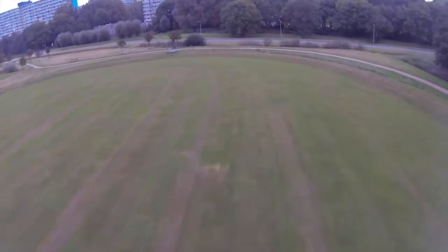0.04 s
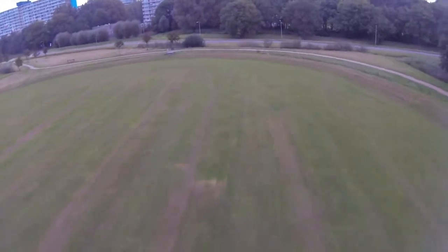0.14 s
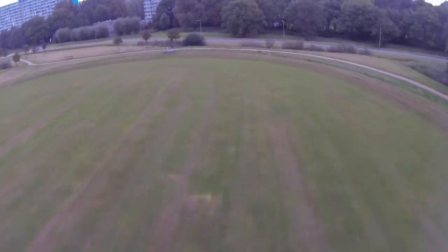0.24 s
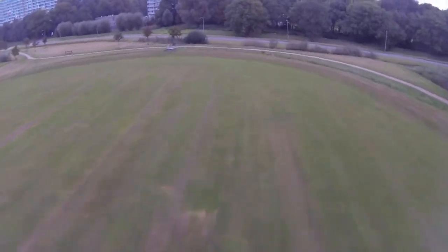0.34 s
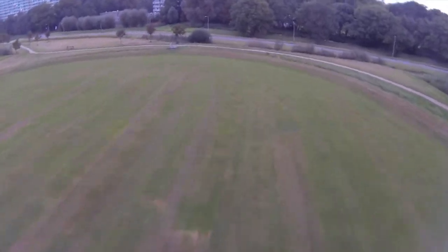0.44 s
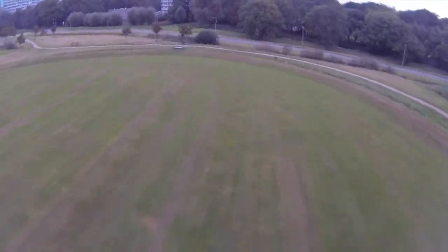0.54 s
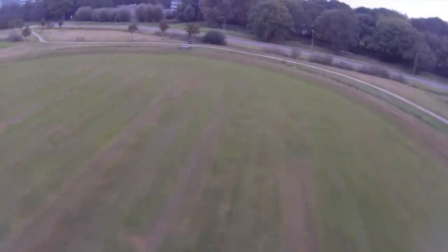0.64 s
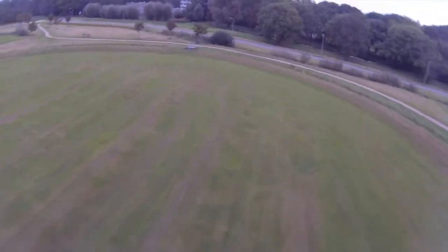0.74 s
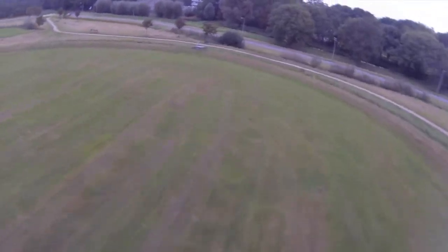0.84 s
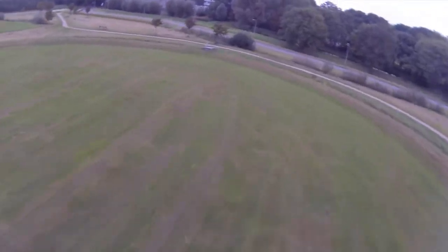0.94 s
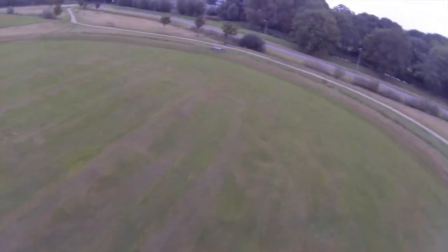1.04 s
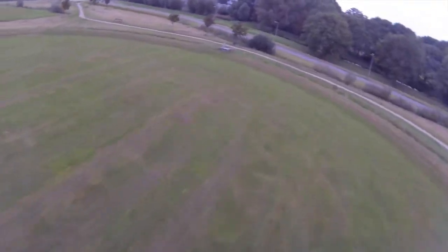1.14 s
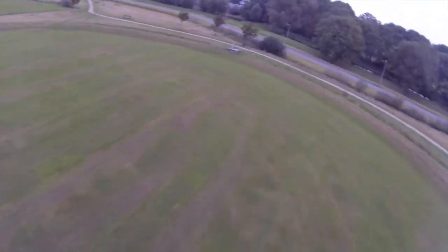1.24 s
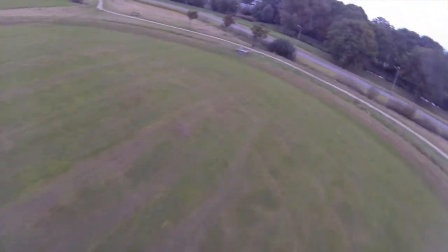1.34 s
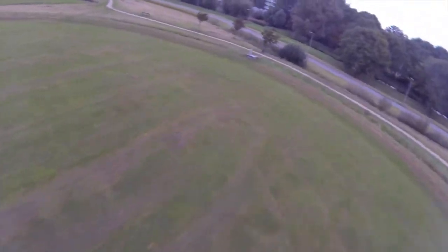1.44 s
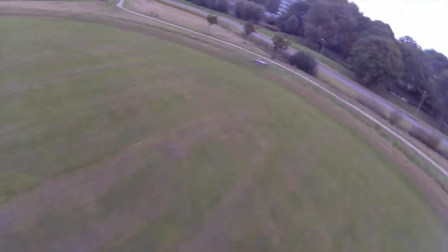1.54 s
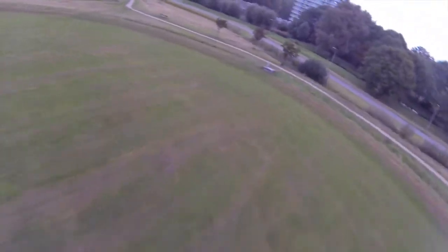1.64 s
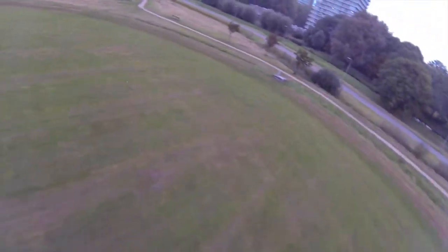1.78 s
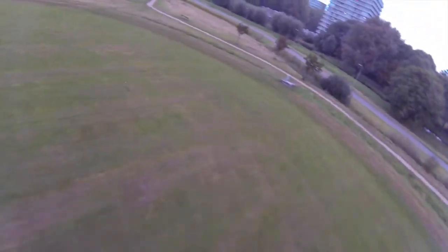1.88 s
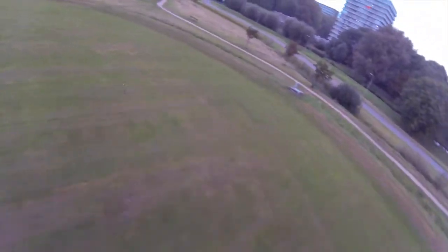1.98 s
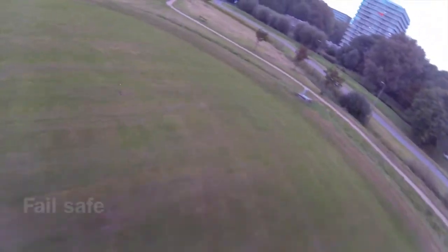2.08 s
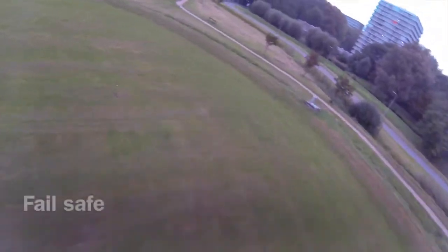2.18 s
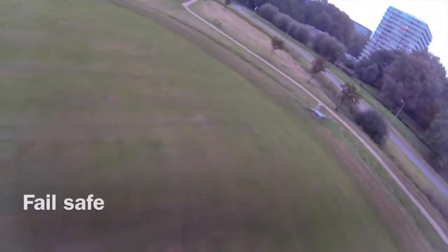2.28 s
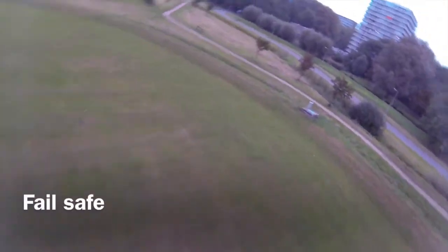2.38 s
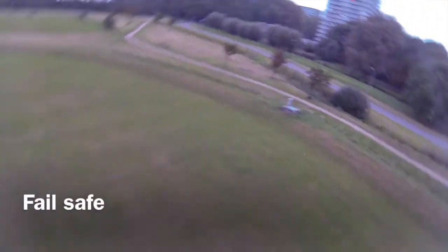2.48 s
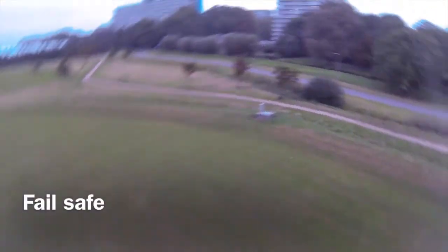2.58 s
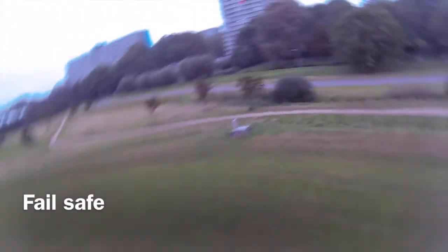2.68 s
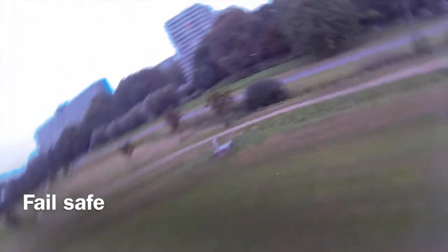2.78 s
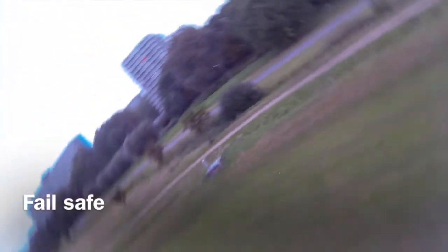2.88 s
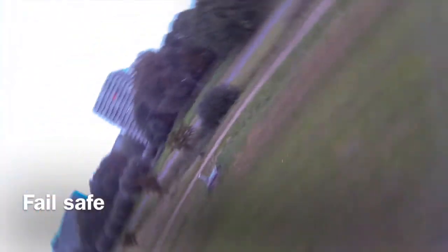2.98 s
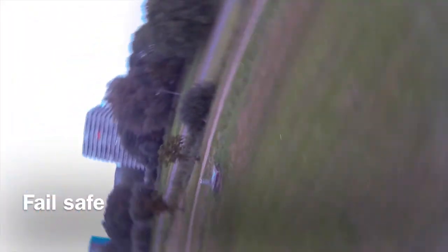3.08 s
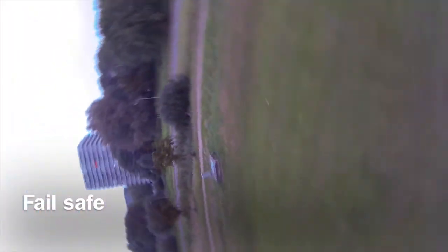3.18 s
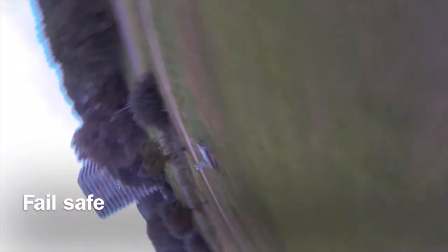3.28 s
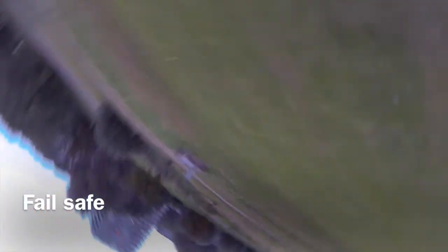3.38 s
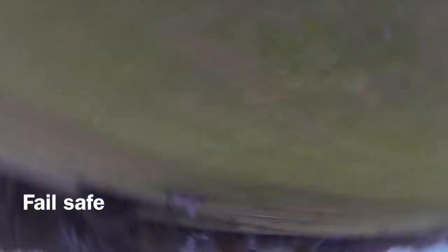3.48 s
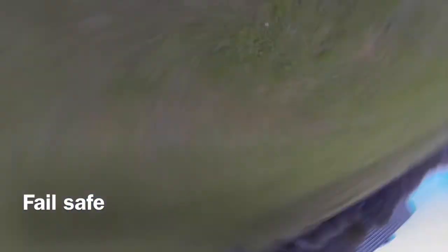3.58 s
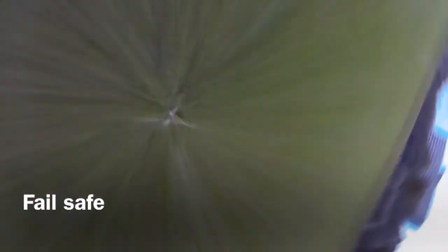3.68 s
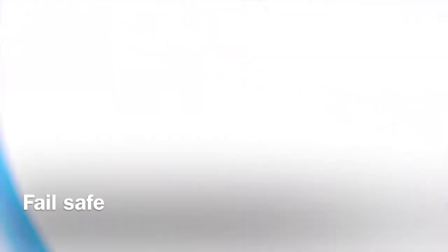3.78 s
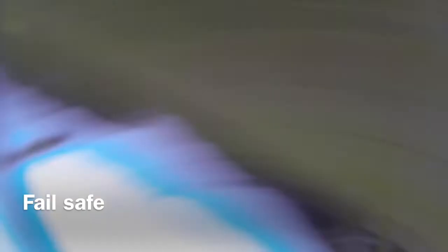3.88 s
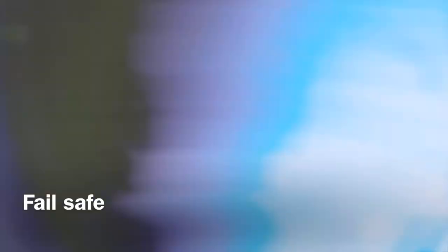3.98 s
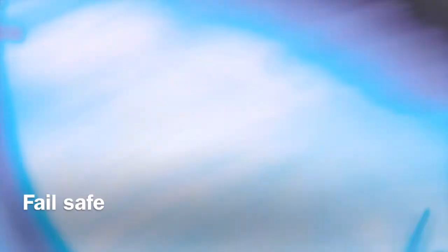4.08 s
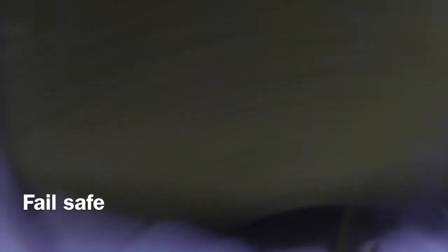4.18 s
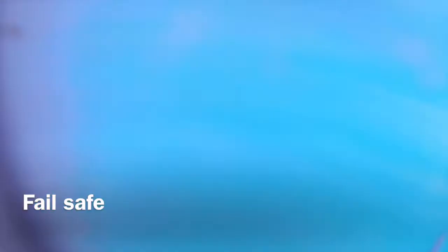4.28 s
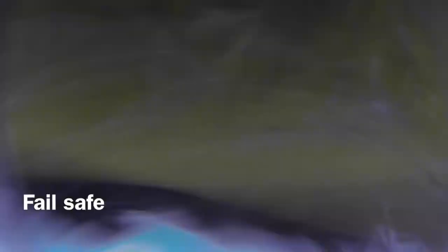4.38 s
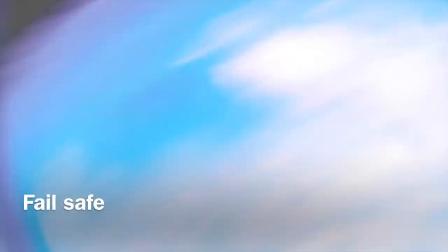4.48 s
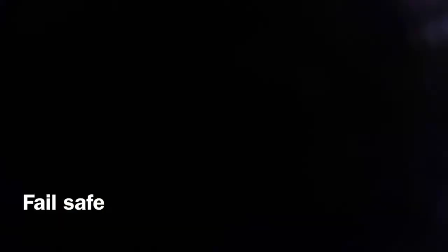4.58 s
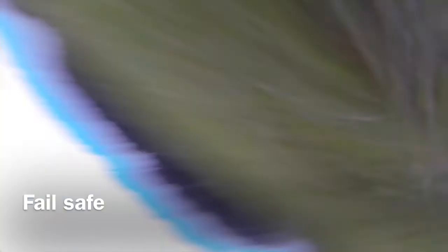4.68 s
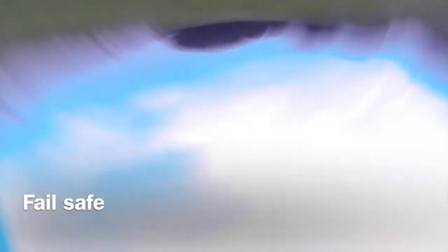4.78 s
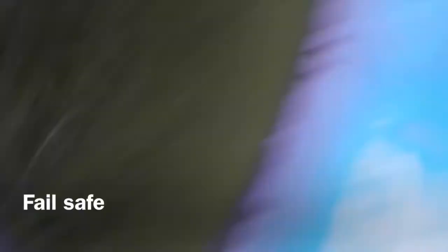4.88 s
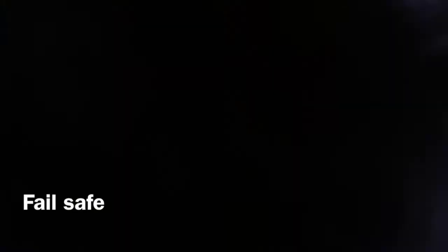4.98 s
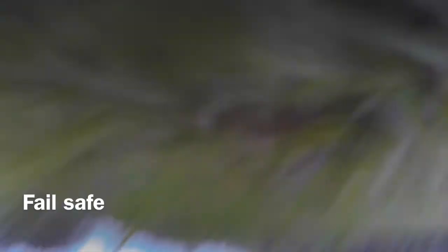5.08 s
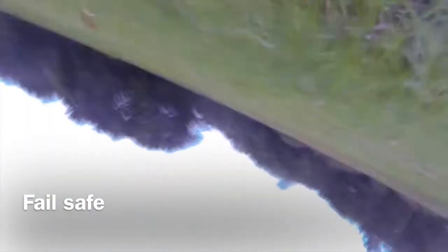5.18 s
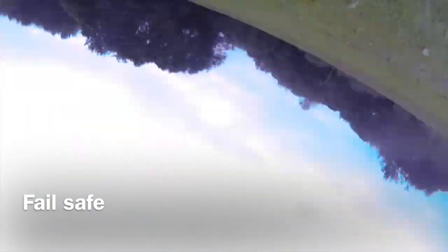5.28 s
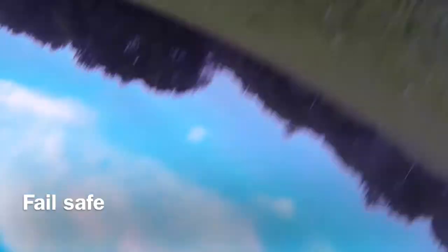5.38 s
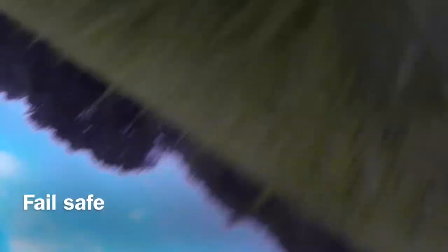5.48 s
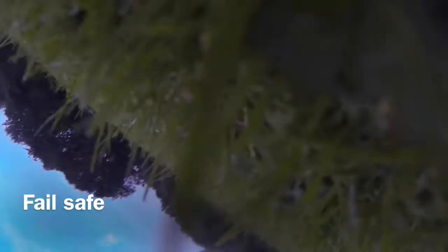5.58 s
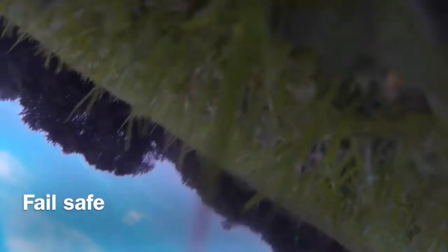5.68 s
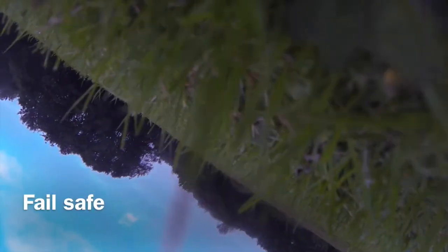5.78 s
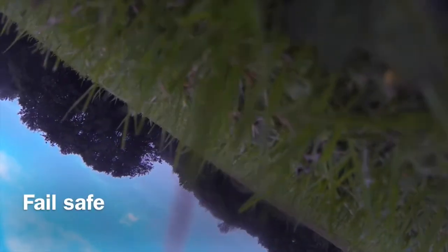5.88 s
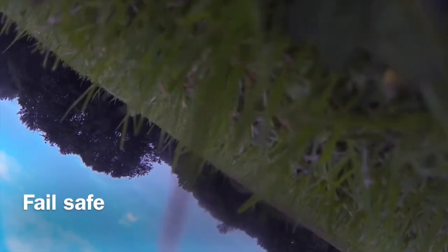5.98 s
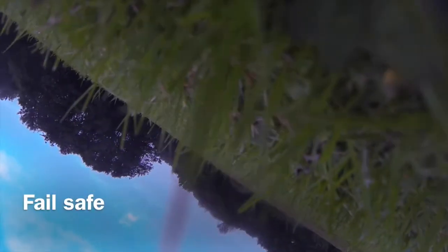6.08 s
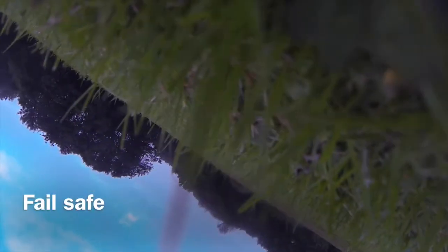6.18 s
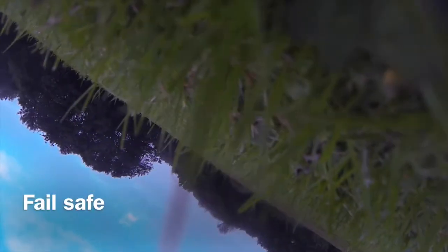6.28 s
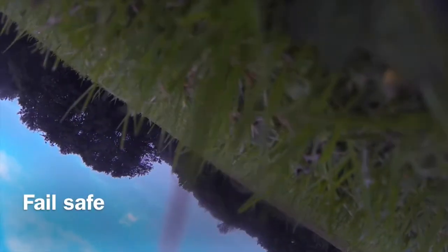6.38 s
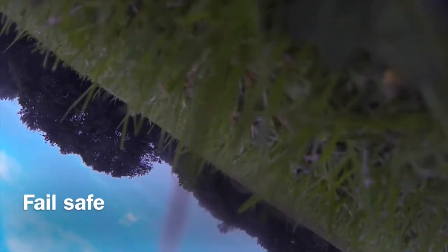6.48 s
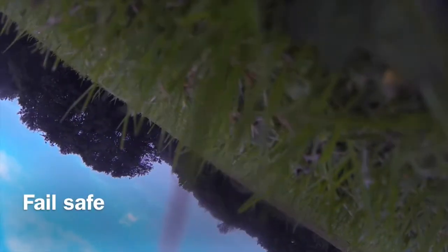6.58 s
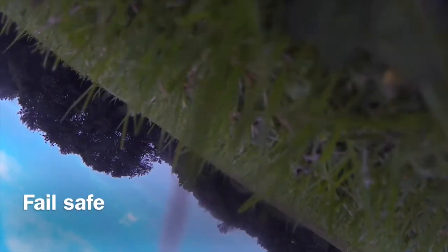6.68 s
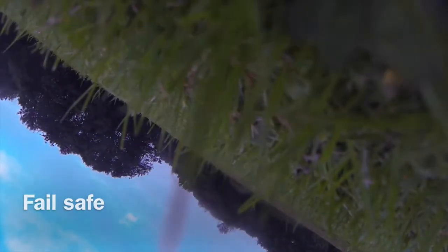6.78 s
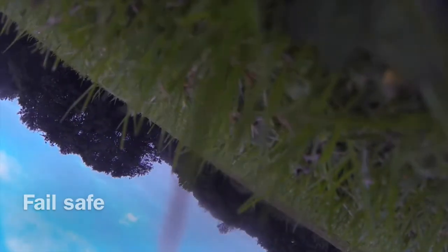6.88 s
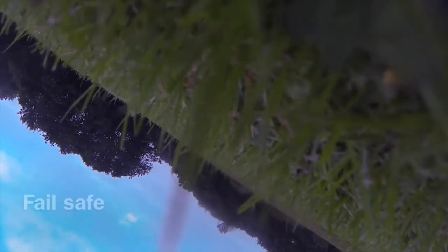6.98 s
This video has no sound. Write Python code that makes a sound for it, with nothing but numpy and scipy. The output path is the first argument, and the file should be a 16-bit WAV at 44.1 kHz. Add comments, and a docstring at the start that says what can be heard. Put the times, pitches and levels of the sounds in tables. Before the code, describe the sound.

A small drone's four propellers buzz close up, cut out and slide down, wind rushes, then it slams and cartwheels through grass and settles ticking.

```python
"""Four propellers buzz and beat, close by, at the microphone of the camera that a small quadcopter carries.
The power cuts: the tones slide down, and air rushes louder over the frame as the craft falls.
It slams into a lawn and cartwheels: thumps, cracks and rings of the frame on a wobbling camera mount.
Noise flicked by grass blades marks the slide; then the frame ticks faintly over the hush of the open field.
Rotors are summed sines, air and grass coloured noise, blows short pushes with damped frame modes."""
import sys
import numpy as np
from scipy import signal
from scipy.fft import rfft, irfft
from scipy.io import wavfile
from scipy.ndimage import uniform_filter1d

SR = 44100
rng = np.random.default_rng(int(sys.argv[2]) if len(sys.argv) > 2 else 0)


def file_out(sig):
    """Save sig as 16-bit WAV at sys.argv[1]."""
    # one column per channel
    cols = np.atleast_2d(sig).T
    # limit, then scale
    lim = np.clip(cols, -1, 1)
    pcm = np.round(lim * 32767).astype(np.int16)
    wavfile.write(sys.argv[1], SR, pcm)


N = 310464
TIME = np.arange(N) / SR  # s

# Colours give relative level per Hz; noise() then scales the coloured noise to rms 1.

# Tones of one rotor; two blades favour even multiples. Each row: multiple of the shaft rate, relative level in dB.
ORDERS = [(1, 2.5), (2, -5.5), (3, -19), (4, -17), (5, -43.5), (6, -31.5), (7, -51), (8, -51), (9, -49),
          (10, -48)]
# Magnetic whine of the motors: multiples of the shaft rate, and the relative level of each in dB.
WHINE_ORDERS = [28, 32, 42]
WHINE_DB = [-65, -65, -64]
# Two motors slow and two speed up as the craft banks. Each row: time in s, shaft speed of each of the four in Hz.
SHAFTS = [(0.0, 206.4, 210.3, 227.9, 229.1), (0.149, 203.1, 208.8, 229.6, 232.2),
          (0.3, 201.7, 205.0, 234.5, 235.6), (0.449, 197.2, 201.6, 234.9, 238.4),
          (0.601, 194.5, 202.9, 233.1, 241.5), (0.799, 189.8, 198.8, 239.6, 245.1),
          (0.998, 190.0, 201.5, 237.3, 240.5), (1.25, 188.1, 201.1, 233.6, 240.2),
          (1.398, 190.9, 201.2, 230.1, 241.5), (1.6, 186.3, 201.7, 227.5, 242.7),
          (1.9, 186.5, 200.0, 228.5, 240.0), (2.19, 185.4, 198.8, 229.8, 239.1)]
# Each rotor's own voice. Each row: change in dB of the unbalance, blade tone, third multiple, fourth multiple, whine.
ROTORS = [(-15, -2, -8, 3.5, -14), (-1, 1.5, -4, 0, -14), (0.5, -0.5, 0, 0, 2), (-5, 3, -8, -5, 3)]
# Each rotor after the cut. Each row: lag in s, slowing time constant in s, change in loudness in dB.
COASTING = [(-0.0089, .18, -7.5), (0, .205, 1), (.006, .17, -2), (-0.015, .2, -4.5)]
# Airframe resonances that the falling tones sweep through. Each row: centre in Hz, width in octaves, boost in dB.
SWEPT_MODES = [(820, .15, 9), (414, .13, 5.5), (255, 0.27, 6.5), (211, 0.17, 4), (148, 0.22, 13.5),
               (124, 0.13, 7), (76, 0.59, 10.5)]
# The buzz swells briefly, twice early in flight and once just as the power cuts. Each row: time in s, half length
# in s, boost in dB.
SURGES = [(0.125, 0.0069, 3), (0.344, 0.028, 3.5), (2.206, 0.017, 3.5)]
# The buzz throbs in the turn. The row: rate in Hz, time of one crest in s, middle of the turn in s, half length in s.
THROB = (5.35, .81, .95, .34)
THROB_DB = 0.74
# The blades slap their own wake as they lose lift. The row: time after the cut in s, half length in s.
SLAP = (0.195, 0.05)
# Lift of the slapped tones. Each entry: multiple of the shaft rate, boost in dB.
SLAP_DB = {4: 10, 6: 9, 8: 30}
# The tones sink into the wind as the blades stall. The row: start in s, length in s.
TONES_FADE = (2.86, 1)
# Filters of the growl's squared and cubed load. Each row: frequency in Hz, gain in dB.
GROWL_SQUARE = [(35, -26.5), (80, -8), (135, 4), (280, -5.5), (450, -12.5), (700, 3.0), (830, -7.5),
                (950, -13.5), (3000, 1)]
GROWL_CUBE = [(500, -21.5), (1100, 3.5), (1400, -3.0), (3000, 0.5)]
# Colour of the turbulence off the blades. Each row: frequency in Hz, relative level in dB per Hz.
WASH = [(30, -6.5), (130, 0.5), (250, 4), (330, -8), (750, -8), (1020, -14), (1320, -14), (1550, -21.5),
        (2100, -22.5), (3000, -37.5), (5000, -50.5), (6000, -55), (8000, -54.5), (11000, -63), (12500, -76)]
# Colour of the coasting blades' rough flutter. Each row: frequency in Hz, relative level in dB per Hz.
FLUTTER = [(100, 1.5), (250, 10), (450, -9), (600, -3.5), (820, -3.5), (1050, -16), (1500, -26.5),
           (3000, -41.5), (6000, -50.5)]
# Loudness of that flutter. Each row: time in s, level in dB.
FLUTTER_LEVEL = [(2.19, -42.5), (2.24, -25.5), (2.3, -29.5), (2.38, -25), (2.45, -37), (2.49, -31),
                 (2.56, -36.5), (2.67, -33.5), (2.85, -49), (3.1, -67)]
# The frame rattles as the rotors slow. The row: clicks per s at first, fade in s, level in dB before colouring.
RATTLE = (37, 0.22, -41)
# Filter of those clicks. Each row: frequency in Hz, gain in dB.
RATTLE_COLOUR = [(1500, -18.5), (3000, -2.5), (5000, 8), (8000, -2.0), (12000, -9.0)]

# Colour of the hiss, shaped by the camera housing. Each row: frequency in Hz, relative level in dB per Hz.
AIR = [(250, -11), (350, -2), (500, -2.5), (660, -6.5), (820, -3), (1030, -7), (1250, -1.5), (1620, -10),
       (2200, -7.5), (2950, -15), (3600, -22.5), (5900, -37), (7500, -38.5), (10500, -47), (14000, -61.5)]
# Strength of the rushing air in the fall. Each row: time in s, level in dB before the lift of the hiss.
RUSH_LEVEL = [(2.2, -56.5), (2.5, -56.5), (2.7, -50.5), (3.0, -48), (3.15, -46.5), (3.3, -40.5),
              (3.45, -36), (3.57, -30), (3.65, -29)]
# Colours of the edge hiss and the edge whistle. Each row: frequency in Hz, relative level in dB per Hz.
EDGE = [(2900, -18), (3400, -1.5), (4800, -2.5), (5700, -25.5), (7500, -13.5), (11000, -30)]
WHISTLE = [(4600, -15), (5450, -8), (6200, -20)]
# Colour of the hollow in the frame. Each row: frequency in Hz, relative level in dB per Hz.
CAVITY = [(1750, -16.5), (2200, -0.5), (2750, -25)]
# The hollow sounds when the roll turns it into the wind. Each row: time in s, level in dB.
CAVITY_LEVEL = [(2.2, -67.5), (2.55, -59), (2.75, -55), (2.97, -45.5), (3.08, -55), (3.2, -57), (3.35, -39),
                (3.6, -33)]
# The hollow hoots again in the cartwheel. Each row: time in s, half length in s, level in dB.
SWISHES = [(4.575, 0.0067, -49), (4.742, .009, -57), (4.927, .01, -60), (5.095, 0.011, -48),
           (5.745, 0.013, -48)]
# Colour of the wind buffeting on the microphone. Each row: frequency in Hz, relative level in dB per Hz.
BUFFET = [(40, 3), (80, -2.5), (115, -6), (190, -0.5), (240, -5), (330, -23), (600, -36.5)]
# Stalling blades buffet it too. The row: time after the cut in s, half length in s, level in dB before doubling.
STALL = (0.5, 0.07, -25)

# Blows against the ground. Each row: time in s, thump peak in dB, push width in ms, crack in dB before colouring,
# crunch of crushed grass in dB.
BLOWS = [(3.672, -6, 1.86, 10, -21), (3.6756, 1.5, 2.2, 12.5, -23), (3.693, -17, 1.4, -43, -66),
         (3.713, -11, 0.42, -33, -67), (3.722, -10, 1, -37, -68), (3.737, -13, 1.65, -31.5, -66),
         (3.75, -16.5, 0.89, -47, -70), (3.81, -14.5, 7.1, -61, -78), (3.999, -6.5, 4.8, -65, -79),
         (4.249, -17.5, 0.72, -38, -66), (4.254, -0.5, 2.06, -34, -43.5), (4.278, -21.5, 3, -24, -49),
         (4.287, 1, 0.79, -11, -40), (4.294, -9, 2, -26, -58), (4.319, -22, 2, -39, -63),
         (4.346, -7, 0.87, -29, -52), (4.352, -12, 2.7, -37, -46), (4.372, -12.5, 2.6, -50, -72),
         (4.395, -10, 3.3, -36.5, -66), (4.448, -14.5, 2.9, -45, -74), (4.544, -8, 1.18, -23, -51.5),
         (4.551, -3.5, 2.3, -20.5, -40.5), (4.618, -16.5, 0.61, -39.5, -62), (4.626, -7.5, 2.2, -37, -53),
         (4.648, -17, 3.4, -32.5, -55), (4.759, -7, 5.8, -26.5, -56), (4.777, -18, 0.76, -36, -56),
         (4.783, -5.5, 1.52, -40, -44), (4.969, -17, 0.89, -31, -59), (4.975, -20.5, 0.66, -35, -54),
         (4.992, -5.5, 3, -34, -52), (5.039, -12, 1.87, -33, -67), (5.046, -7, 3.6, -38, -57),
         (5.132, -10.5, 1.7, -35, -45), (5.138, -2, 3.2, -32, -46), (5.159, -17, 2.5, -24, -63),
         (5.196, -15, 0.78, -34, -52), (5.203, -5, 2.4, -24.5, -54), (5.29, -16.5, 2.1, -45, -70),
         (5.47, -5.5, 5.1, -40, -54)]
# Modes of the struck frame. Each row: frequency in Hz, relative level in dB, time to fall 60 dB in s.
FRAME = [(316, 9, 0.018), (475, 7.5, 0.0078), (620, 15, 0.0063), (1016, 3, 0.011), (1270, 5, 0.0077),
         (1800, -1, 0.014), (2300, 2.5, 0.0045), (3150, -21, 0.0059)]
# Filter of the cracks. Each row: frequency in Hz, gain in dB.
CRACK = [(300, -2), (1200, -24.5), (2500, 0.5), (4000, -18), (8000, -26), (15000, -34.5)]
# Colour of the swaying camera mount. Each row: frequency in Hz, relative level in dB per Hz.
SWAY = [(22, -6.0), (30, -4.5), (40, -8.0), (55, -13.5), (80, -24.5), (130, -29.5), (240, -41), (400, -53)]
# Longer sweeps of the frame through the grass. Each row: time in s, half length in s, level in dB.
SCRAPES = [(3.931, 0.0085, -59.5), (4, 0.02, -61), (4.335, 0.014, -57), (4.54, 0.0067, -39.5),
           (4.6, 0.044, -53.5), (4.743, 0.0071, -52.5), (4.975, 0.019, -51), (5.045, 0.024, -51),
           (5.112, 0.028, -43), (5.398, 0.0092, -41.5), (5.425, 0.012, -29.5), (5.458, 0.034, -30.5),
           (5.52, 0.041, -47.5), (5.647, 0.033, -43), (5.757, 0.025, -47.5)]
# The frame digs in and tears the grass. The row: time in s, half length in s, level in dB.
DIG = (5.442, 0.02, -47)
# Colours of brushed grass, crushed grass and snapping stalks. Each row: frequency in Hz, relative level in dB per Hz.
GRASS = [(200, -0.5), (350, -7.5), (550, -8.5), (700, -7.5), (850, -12), (1250, -12), (1600, -15),
         (2150, -14), (3100, -20), (4000, -28), (5200, -38), (10000, -42), (14500, -59)]
CRUNCH = [(800, -4), (2500, -2.5), (4500, -3.5), (9000, -15.5), (14000, -21)]
SNAP = [(600, -21.5), (1400, 11.5), (2300, 14.5), (3300, 6), (5000, -7.5), (10000, -21), (14000, -28)]
# Clearest ticks and knocks on the frame. Each row: time in s, level in dB, contact noise in dB re level before
# colouring, frequency in Hz around which the struck spot rings most.
TICKS = [(2.294, -29, -6, 2940), (4.058, -46.5, 3, 2380), (4.376, -35, -13, 2300),
         (5.385, -32.5, 4.5, 1910), (5.486, -3, -38, 1270), (5.494, -0.5, -43, 1270),
         (5.57, -35.5, 3, 2400), (5.64, -11, -30, 850), (5.673, -29, 1, 2390), (5.775, -36, 4, 3000),
         (5.808, -38, 1.5, 3020), (5.827, -36, -6, 1500), (5.851, -35.5, 0, 1820), (5.902, -43, -8, 2200),
         (5.927, -43, -3, 2460), (5.952, -30.5, -10.5, 1400), (6.082, -39, 0, 3020),
         (6.255, -40, -2.5, 1500), (6.4191, -9.5, -9.5, 1420), (6.609, -35.5, -7.5, 1565),
         (6.797, -32, -5, 3100), (6.999, -46, -7, 3300)]
# Stalks slip after the slide. The row: clicks per s at first, fade in s, level in dB before colouring.
STALKS = (130, .16, -43)
# Filter of the ticks' contact noise. Each row: frequency in Hz, gain in dB.
TICK_COLOUR = [(300, -3.0), (750, -2), (1350, 13.5), (2400, 9.5), (3200, 8.5), (4500, -1), (7000, -13),
               (9500, -23.5), (15000, -17.5)]
# Colour of the open field. Each row: frequency in Hz, relative level in dB per Hz.
FIELD = [(25, 7), (60, -2), (115, -12.5), (260, -18.5), (520, -22.5), (1200, -29), (2300, -32.5),
         (4000, -38), (8000, -43.5), (13000, -48), (15000, -48.5)]

# The power cuts; the propellers slow towards a windmilling share of flying speed.
CUT_S, SPIN_DOWN_S, WINDMILL_SHARE = 2.195, .14, .075
# Gain of the tones at flying speed, and its limit towards standstill.
BUZZ_DB, WINDMILL_DB = -18, -21
THRUST_WASH_DB = -26.5
# Buffeting before doubling: steady part, and share of the rush; the latter builds over the last SURGE_S of the fall.
BUFFET_DB, BUFFET_OVER_RUSH_DB, SURGE_S = -31.5, 2.5, .42
# A push this wide rings the frame as loudly as its crack setting, shorter ones more; above the ceiling it yields.
RING_WIDTH_MS, RING_CEILING_DB = 2.41, 4
# Sway after a 0 dB thump, sway re scrape while grass drags, and the time for it to fall 60 dB.
SWAY_BLOW_DB, SWAY_DRAG_DB, SWAY_T60_S = -21.5, 13, 1
# Every blow brushes the grass: level re thump, half length, lead.
BRUSH_DB, BRUSH_S, BRUSH_LEAD_S = -46, 0.0054, .002
# Stalks that snap in the sweeps: rate, and level re scrape.
SNAPS_PER_S, SNAP_DB = 330, -7
# The slide ends at REST_S; from there all that is heard of the background grows louder over LIFT_S.
REST_S, LIFT_S, FIELD_MOVING_DB, FIELD_REST_DB = 5.5, 0.24, -57.5, -51.5
CAMERA_HZ, CAMERA_DB = 13905, -78.5  # thin electronic whistle, rms level
TOP_HZ = 15200  # upper limit of the recorded band


def rotors(flutter_db=2.0, coast_dull_db=1.9, coast_jitter=0.0061):
    """Four beating rotors; unbalance and whine die with the power, and each blade chops turbulence into puffs."""
    jitter, shake = .0019, .3
    speed = spin()
    power = speed ** 4
    effort = effort_db()
    slap = swell(CUT_S + SLAP[0], SLAP[1])
    times, *shafts = np.transpose(SHAFTS)
    grid_hz = np.arange(1, 1500)
    airframe_db = sum(db * np.exp(-(np.log2(grid_hz / hz) / octaves) ** 2) for hz, octaves, db in SWEPT_MODES)
    tones, load = 0, 0
    for shaft, (*own_db, whine_db), (lag_s, slowing_s, coast_db) in zip(shafts, ROTORS, COASTING):
        # each propeller lets go at its own moment, slows at its own rate and wavers as it coasts
        hz = np.interp(TIME, times, shaft) * spin(lag_s, slowing_s)
        waver = jitter * walk(35.34) + coast_jitter * (1 - power) * walk(90)
        angle = 2 * np.pi * np.cumsum(hz * (1 + waver)) / SR + rng.uniform(0, 2 * np.pi)
        voice_db = dict(enumerate(own_db, 1))
        for k, db in ORDERS:
            gain_db = db + voice_db.get(k, 0) + SLAP_DB.get(k, 0) * slap
            if k > 1:
                gain_db = gain_db + flutter_db * walk(40) + effort
            # coasting, each tone swells as it passes through a resonance of the airframe
            coasting_db = coast_db + np.interp(k * hz, grid_hz, airframe_db) - coast_dull_db * max(k - 2, 0)
            gain = undb(gain_db + coasting_db * (1 - power))
            unbalance = speed ** 3 if k % 2 else 1  # odd multiples die with speed
            tones = tones + gain * unbalance * np.sin(k * angle + rng.uniform(0, 2 * np.pi))
        for k, db in zip(WHINE_ORDERS, WHINE_DB):
            tones = tones + undb(db + whine_db + flutter_db * walk(40)) * power ** 2 * np.sin(k * angle)
        load = load + np.cos(2 * angle) + shake * power * undb(own_db[0]) * np.cos(angle)
    load = load * np.interp(TIME, [0, .01, 3.7, 4], [0, 1, 1, 0])
    buzz = undb(WINDMILL_DB + (BUZZ_DB - WINDMILL_DB) * speed) * (1 - ramp(*TONES_FADE))
    pitched = (tones + growl(load) * undb(effort)) * buzz
    return (pitched + blade_wash(load, effort)) * airborne(0.022, early_s=.02)


def growl(load, square_db=-15, cube_db=-34):
    """The shaken frame yields unevenly, so the rotors breed sum and difference tones: a dense, rasping growl."""
    rasp = undb(square_db) * colour(load ** 2 - np.mean(load ** 2), GROWL_SQUARE)
    rasp += undb(cube_db) * colour(load ** 3, GROWL_CUBE)
    return (rasp + 1.4 * resound(rasp, t60_s=1.0)) * spin(0.004) ** 4


def blade_wash(load, effort, chop=0.84):
    """Turbulence chopped into puffs by the blades, giving way to rough flutter as they coast."""
    puffs = np.exp(chop * load / 2)
    thrust = noise(WASH, puffs) * undb(THRUST_WASH_DB + effort) * (1 - ramp(CUT_S + 0.024, 0.026))
    flutter = noise(FLUTTER, np.sqrt(puffs)) * curve(FLUTTER_LEVEL) * ramp(CUT_S, 0.012)
    return thrust + flutter


def spin(lag_s=0, slowing_s=SPIN_DOWN_S):
    """Share of flying speed: full until the cut, then slowing exponentially to a windmill."""
    return WINDMILL_SHARE + (1 - WINDMILL_SHARE) * np.exp(-np.maximum(TIME - CUT_S - lag_s, 0) / slowing_s)


def effort_db():
    """The buzz swells briefly, twice early in flight and once just as the power cuts, and throbs in the turn."""
    rate_hz, crest_s, middle_s, width_s = THROB
    throb = THROB_DB * np.cos(2 * np.pi * rate_hz * (TIME - crest_s)) * swell(middle_s, width_s)
    return throb + sum(db * swell(s, half_s) for s, half_s, db in SURGES)


def rattle():
    """Thin, bright clicks from the frame as the rotors run down."""
    return colour(scatter(CUT_S, *RATTLE), RATTLE_COLOUR)


def falling_air(gust_db=1.0, whistle_db=-60, edge_db=-13, edge_s=3.15):
    """Air hisses over the frame, sounds its hollow and buffets the microphone; edges whistle and hiss in the roll."""
    whistle_s, lull_s = 2.97, .021
    rush = curve(RUSH_LEVEL)
    hiss = noise(AIR, undb(gust_db * walk(120))) * rush * undb(5.0)
    edge_gain = np.minimum(rush, undb(-45.5)) * undb(edge_db)
    edge = noise(EDGE) * edge_gain * ramp(edge_s, 0.045)
    cavity = noise(CAVITY, undb(3.2 * walk(30))) * curve(CAVITY_LEVEL)
    after_s, width_s, stall_db = STALL
    shove = undb(BUFFET_DB) + rush * undb(BUFFET_OVER_RUSH_DB) * ramp(BLOWS[0][0] - SURGE_S, SURGE_S)
    stall = undb(stall_db) * swell(CUT_S + after_s, width_s)
    buffet = noise(BUFFET) * np.hypot(shove, stall) * 2
    fall = (hiss + edge + buffet + cavity) * ramp(CUT_S, 0.3) * airborne(0.0092, early_s=lull_s)
    whistle = noise(WHISTLE) * undb(whistle_db) * swell(whistle_s, 0.016)
    return fall + whistle + noise(CAVITY) * swells(SWISHES)


def airborne(fade_s, early_s=0):
    """One in the air, fading out from early_s before the first blow."""
    return 1 - ramp(BLOWS[0][0] - early_s, fade_s)


def tumble(swing_width=2.6, lead_s=0.00061):
    """Each blow is a short push within a wider, weaker opposite swing on both sides; short pushes ring the frame most."""
    thumps, cracks, rings = np.zeros((3, N))
    t = TIME[:8820] - .1
    for s, thump_db, width_ms, crack_db, _ in BLOWS:
        u = 1000 * t / width_ms
        push = np.exp(-u ** 2 / 2) - np.exp(-(u / swing_width) ** 2 / 2) / swing_width
        add(thumps, s + t[0], -undb(thump_db) * push / push.max())
        burst, ring = strike(crack_db, 0.0022, min(crack_db, RING_CEILING_DB))
        add(cracks, s - lead_s, burst)
        add(rings, s - lead_s, ring * RING_WIDTH_MS / width_ms)
    return thumps + rings + undb(5.5) * colour(cracks, CRACK)


def strike(bright_db, contact_s, ring_db, spot_hz=1000, focus_db=0):
    """Contact noise and the damped frame modes that it excites, most near spot_hz; peaks at bright_db and ring_db."""
    t = TIME[:2048]
    burst = rng.standard_normal(len(t)) * t * np.exp(-2 * t / contact_s)
    ring = np.zeros(len(t))
    for hz, db, t60 in FRAME:
        gain = undb(db - focus_db * abs(np.log2(hz / spot_hz))) * rng.choice([-1, 1])
        detuned_hz = hz * (1 + 0.058 * rng.standard_normal())
        ring += gain * undb(-60 * t / t60) * np.sin(2 * np.pi * detuned_hz * t)
    ring = ring * (1 - np.exp(-2 * t / contact_s))
    return burst / np.abs(burst).max() * undb(bright_db), ring / np.abs(ring).max() * undb(ring_db)


def mount(give=0.4, rise_s=0.011):
    """The camera wobbles on its soft mount: blows and dragging grass feed the sway, which then dies away."""
    keep = undb(-60 / (SWAY_T60_S * SR)) ** 2  # share of power kept per sample
    feed = (1 - keep) * (undb(SWAY_DRAG_DB) * swells(SCRAPES)) ** 2
    for s, thump_db, *_ in BLOWS:
        add(feed, s, undb([SWAY_BLOW_DB + give * thump_db]) ** 2)
    power = signal.lfilter([1], [1, -keep], feed)
    sway = uniform_filter1d(np.sqrt(power), int(rise_s * SR) + 1)
    return noise(SWAY) * sway


def grass(grain_db=3.0, patchy_db=0.24, snap_spread_db=7.0, crunch_s=0.0016, crunch_lag_s=0.0016):
    """Countless blades flick the frame as it hits or sweeps through the lawn; some snap, and blows crush them."""
    flicks = undb(grain_db * walk(700) + patchy_db * walk(80))
    drag = swells(SCRAPES)
    brushes = swells([(s - BRUSH_LEAD_S, BRUSH_S, thump_db + BRUSH_DB) for s, thump_db, *_ in BLOWS])
    crunches = swells([(s + crunch_lag_s, crunch_s, db) for s, *_, db in BLOWS] + [DIG])
    snap_gain = undb(snap_spread_db * np.clip(rng.standard_normal(N), -2, 2))
    snaps = (rng.random(N) < SNAPS_PER_S / SR) * snap_gain
    snapping = unit(colour(resound(snaps, t60_s=0.0087), SNAP)) * drag * undb(SNAP_DB)
    return noise(GRASS, flicks) * np.hypot(drag, brushes) + snapping + noise(CRUNCH, flicks) * crunches


def settling():
    """The frame ticks and knocks, at rest mostly as bent stalks slip free against it."""
    cracks, rings = scatter(REST_S, *STALKS), np.zeros(N)
    for s, db, bright_db, spot_hz in TICKS:
        burst, ring = strike(bright_db, contact_s=0.0009, ring_db=-15.5, spot_hz=spot_hz, focus_db=14.0)
        add(cracks, s, undb(db) * burst)
        add(rings, s, undb(db) * ring)
    return rings + colour(cracks, TICK_COLOUR)


def background():
    """Field hush as drifting coloured noise and an electronic whistle as a sine, both heard louder after the crash."""
    lift = ramp(REST_S, LIFT_S)
    whistle = np.sqrt(2) * np.sin(2 * np.pi * CAMERA_HZ * TIME) * lift
    field_db = FIELD_MOVING_DB + (FIELD_REST_DB - FIELD_MOVING_DB) * lift
    return noise(FIELD, undb(walk(2))) * undb(field_db) + undb(CAMERA_DB) * whistle


def undb(db):
    """Decibels to gain."""
    return 10 ** (np.asarray(db) / 20)


def unit(x):
    """Scale to rms 1."""
    return x / np.sqrt(np.mean(x ** 2))


def colour(x, points):
    """Causal minimum-phase filter through (Hz, dB) points, falling 18 dB per octave beyond both ends."""
    hz, db = np.transpose(points)
    octave = np.log2(np.maximum(np.arange(N // 2 + 1) * SR / N, 1))
    outside = np.maximum(np.log2(hz[0]) - octave, 0) + np.maximum(octave - np.log2(hz[-1]), 0)
    gain_db = np.maximum(np.interp(octave, np.log2(hz), db) - 18 * outside, -100)
    # folding the cepstrum onto positive times makes the filter causal
    cepstrum = irfft(np.log(undb(gain_db)), N)
    cepstrum[1:N // 2] *= 2
    cepstrum[N // 2 + 1:] = 0
    return irfft(rfft(x) * np.exp(rfft(cepstrum)), N)


def noise(points, gate=1):
    """Coloured noise of rms 1, chopped by a gate before it is coloured."""
    return unit(colour(rng.standard_normal(N) * gate, points))


def walk(rate):
    """Smooth chance with spread near 1 and rate knots per s, held once the knots run out."""
    knots = rng.standard_normal(4096)
    line = np.interp(TIME * rate, np.arange(len(knots)), knots)
    return uniform_filter1d(line, max(int(SR / rate / 2), 1)) * np.sqrt(2)


def add(track, s, sound):
    """Mix a short sound into a track at time s."""
    start = int(np.clip(s * SR, 0, N - 1))
    track[start:start + len(sound)] += sound[:N - start]


def swell(s, width_s):
    """A steep-sided rise and fall around time s."""
    out, near = np.zeros(N), np.abs(TIME - s) < 5 * width_s
    out[near] = np.exp(-np.abs((TIME[near] - s) / width_s) ** 3 / 4)
    return out


def swells(rows):
    """Joint gain of several (s, half length s, dB) swells, added in power."""
    return np.sqrt(sum((undb(db) * swell(s, width_s)) ** 2 for s, width_s, db in rows))


def resound(x, t60_s):
    """The frame's many close modes, as a decaying noise tail, smear a vibration in time and keep its power."""
    t = TIME[:8192]
    tail = rng.standard_normal(len(t)) * undb(-60 * t / t60_s)
    return signal.fftconvolve(x, tail / np.sqrt(np.sum(tail ** 2)))[:N]


def ramp(start_s, length_s):
    """Zero before the start, rising evenly to one."""
    return np.clip((TIME - start_s) / length_s, 0, 1)


def curve(points):
    """Gain along a curve of (s, dB) points."""
    return undb(np.interp(TIME, *np.transpose(points)))


def scatter(start_s, per_s, fade_s, db, spread_db=4):
    """Random clicks of uneven size that thin out after the start."""
    rate = per_s * np.exp(-np.maximum(TIME - start_s, 0) / fade_s) * (TIME > start_s)
    return (rng.random(N) < rate / SR) * undb(db + spread_db * np.clip(rng.standard_normal(N), -2, 2))


def scene():
    """Flight, fall, crash and rest at the one microphone on board."""
    fade_in = np.minimum(TIME / .004, 1)
    craft = rotors() + rattle() + falling_air()
    crash = tumble() + mount() + grass() + settling()
    return (fade_in * (craft + crash + background()))[None]


def record(dry):
    """The camera clips the hardest blows and cuts the top."""
    low_pass = signal.ellip(8, .2, 80, TOP_HZ, fs=SR, output="sos")
    return signal.sosfilt(low_pass, np.clip(dry, -1, 1))


dry = scene()
out = record(dry)
file_out(out)
```